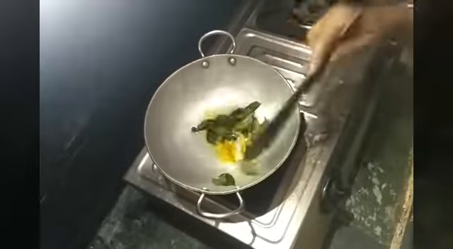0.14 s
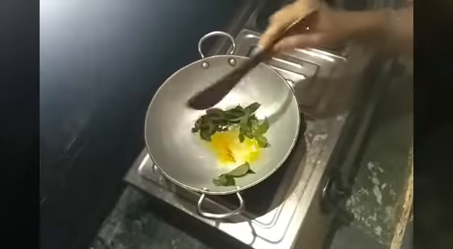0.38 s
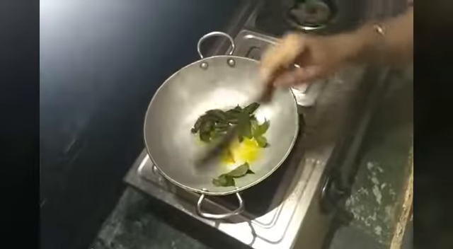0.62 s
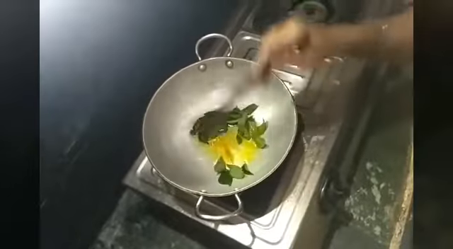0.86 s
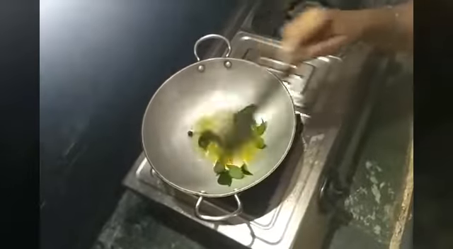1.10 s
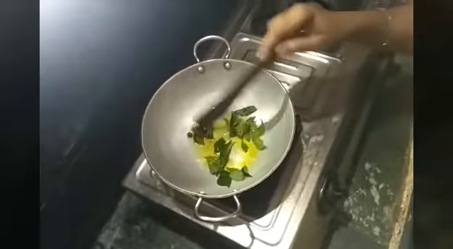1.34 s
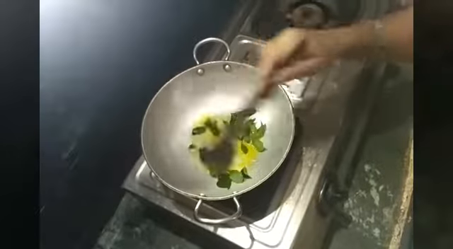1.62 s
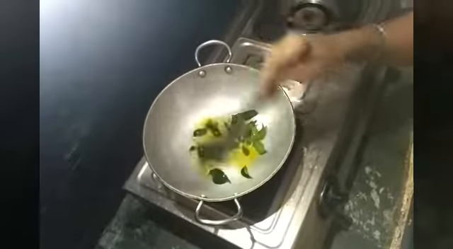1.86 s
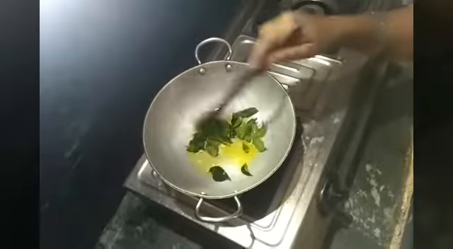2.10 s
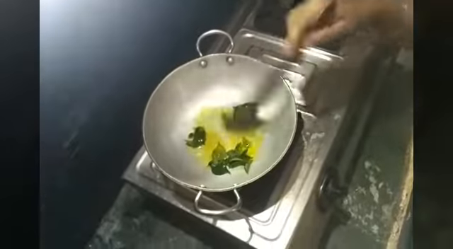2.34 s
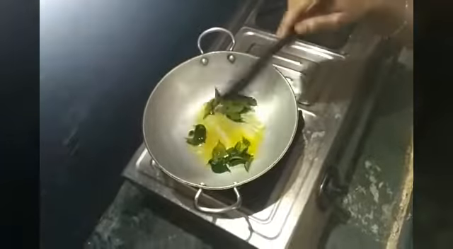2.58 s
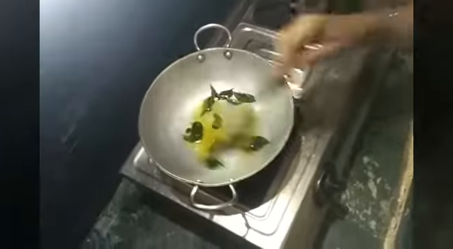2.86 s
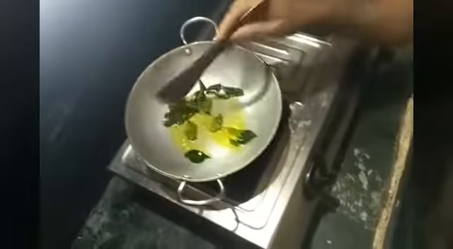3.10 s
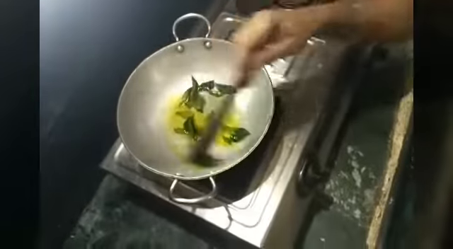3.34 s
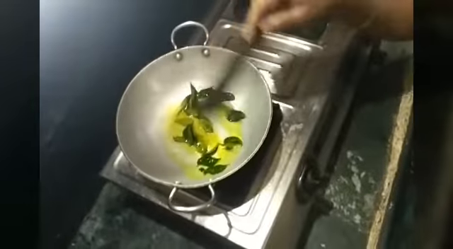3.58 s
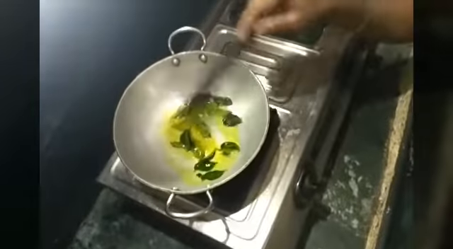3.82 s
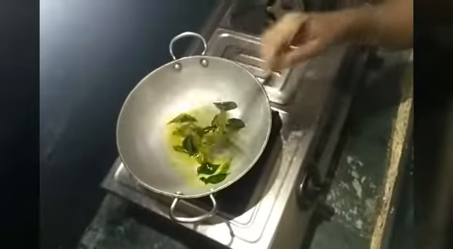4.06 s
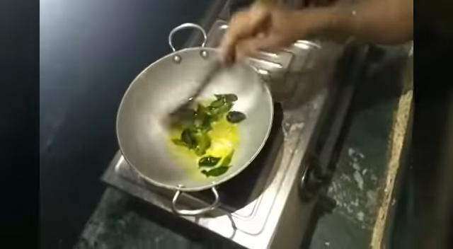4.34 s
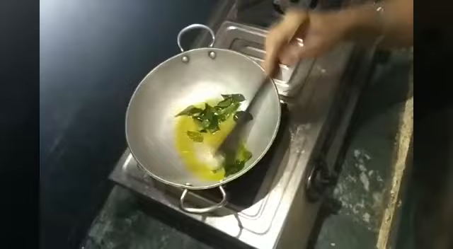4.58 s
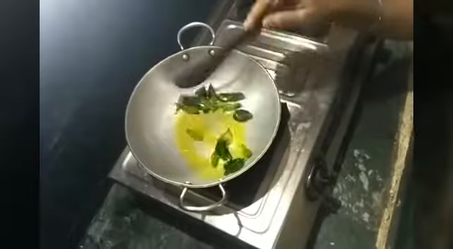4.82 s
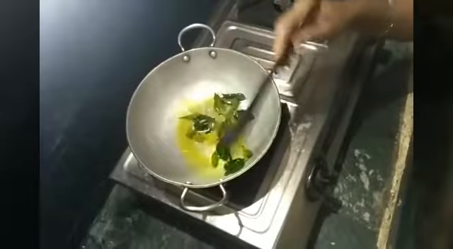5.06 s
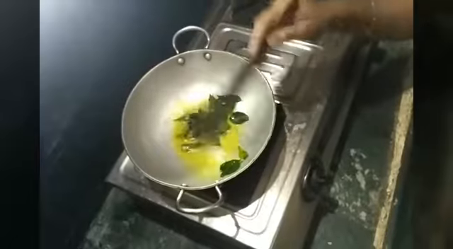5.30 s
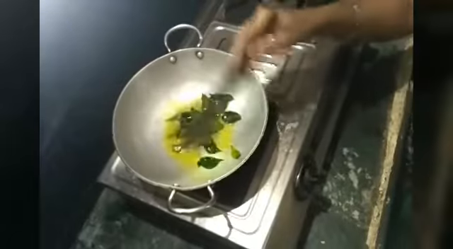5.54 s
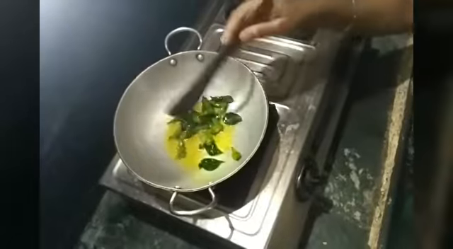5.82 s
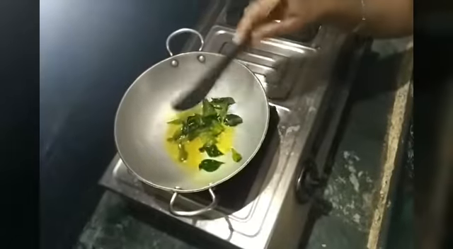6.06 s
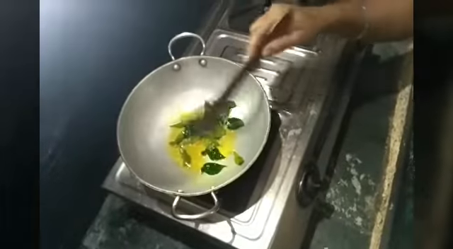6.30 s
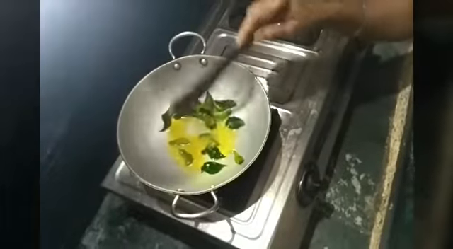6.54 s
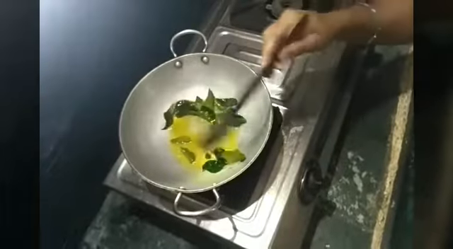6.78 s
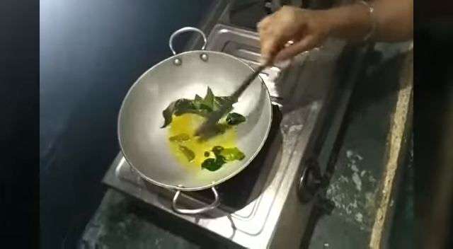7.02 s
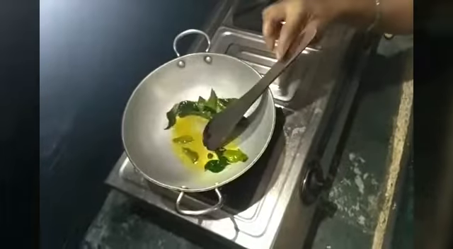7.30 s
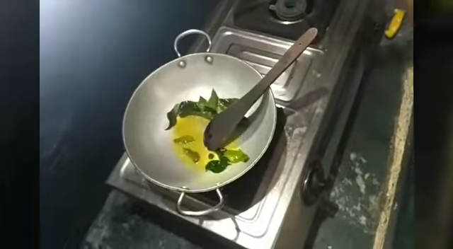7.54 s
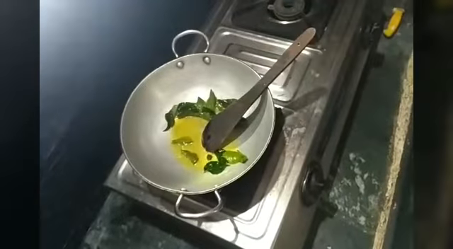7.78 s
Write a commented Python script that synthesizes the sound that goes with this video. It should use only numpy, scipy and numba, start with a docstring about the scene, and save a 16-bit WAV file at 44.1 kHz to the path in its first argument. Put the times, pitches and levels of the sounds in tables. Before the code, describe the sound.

Crisp high frying fizz, crackling steam bursts and dull wooden knocks on a thin steel pan, ending with a loud spatula clack against the rim.

```python
"""From the first moment fresh leaves fry in hot oil in a round steel pan: clumped steam bubbles fizz,
deeper ones gurgle, and a low drone swells and sinks under the hush of a small kitchen.
Soon trapped water spits in sharp pops with dying swarms of crackles, and a wooden spatula knocks
the pan's ringing modes, scrapes in noisy strokes and draws faint notes from the steel.
Near the end the spatula drops on the rim in a clatter; one microphone hears it all."""
import sys
import numpy as np
from scipy import signal
from scipy.fft import rfft, irfft, next_fast_len
from scipy.io import wavfile
from scipy.ndimage import uniform_filter1d
from numba import njit

SR = 44100
rng = np.random.default_rng(int(sys.argv[2]) if len(sys.argv) > 2 else 0)


def volts_from_decibels(level):
    """Turn decibel levels (scalar or array-like) into linear amplitude factors."""
    exponent = np.asarray(level, float) / 20
    return 10 ** exponent


def int16_out(signal):
    """Quantize to a 16-bit WAV file."""
    q = np.round(np.clip(np.atleast_2d(signal).T, -1, 1) * 32767)
    wavfile.write(sys.argv[1], SR, q.astype(np.int16))


N = 348398
TIME = np.arange(N) / SR  # seconds

# Frying bed. Each row: time in seconds, small-bubble level in dB, large-bubble level in dB.
FRYING_LEVELS = [(0.0, -56, -56), (0.33, -49, -54), (0.83, -52, -63.5), (1.12, -45, -55), (1.3, -53.5, -59),
                 (3.1, -47.5, -53.5), (3.32, -52.5, -58.5), (4.29, -50.5, -58.5), (4.75, -50, -57),
                 (4.97, -50.5, -63.5), (7.5, -54, -64.5), (7.9, -53, -76)]
# Tone of the frying bed. Each row: bubble pitch in Hz, relative weight in dB.
BUBBLE_TONE = [(2650, -49), (4500, -37), (6690, -12), (7260, -24), (9070, 11.5), (9690, -1.5), (11100, 9),
               (15200, 0.5), (16100, -23), (16500, -46)]
# Deep bubbles under the leaves. One row: middle pitch in Hz, range in octaves, level in dB,
# depth of clumping in dB.
DEEP_BUBBLES = (2371, 0.67, -67, 2.2)
# Low drone. Each row: time in seconds, level in dB.
DRONE_LEVELS = [(0.0, -50.5), (0.9, -59.5), (1.87, -91), (1.93, -54), (2.02, -84), (2.2, -47.5),
                (2.38, -43), (2.46, -68), (2.53, -54), (2.73, -49), (2.75, -68), (2.84, -44), (2.95, -47.5),
                (3.06, -67), (3.1, -50), (3.39, -52), (3.41, -42.5), (3.67, -35.5), (4.0, -51.5),
                (4.03, -68), (4.16, -42), (4.49, -37.5), (4.84, -72.5), (5.39, -37.5), (5.74, -40),
                (5.79, -49), (6.01, -52.5), (6.09, -34), (6.49, -51), (6.62, -47.5), (6.8, -79), (7.2, -69),
                (7.75, -95), (7.9, -52)]
# Resonances rumbling above the drone. Each row: pitch in Hz, width as a share of the pitch,
# level in dB against the others.
RUMBLE_BANDS = [(99.5, .1, 1.5), (134.3, .12, -0.5), (172.5, 0.12, -5.5), (145, 0.79, -9.5)]
# Tone of the room hush. Each row: frequency in Hz, relative level in dB.
KITCHEN_TONE = [(15, -42), (25, 1), (82, 10), (146, 1), (450, 0.5), (516, -2), (695, -1.5), (1230, -5),
                (1700, -5.5), (2290, -3), (2880, -9), (4770, -13), (6000, -11), (7800, -57), (13200, -120)]
# Hum of the pan's deepest mode. Each row: time in seconds, level in dB.
HUM_LEVELS = [(0.0, -59), (0.33, -85), (0.44, -58), (1.38, -79), (1.43, -61), (1.82, -82), (1.96, -54.5),
              (2.53, -56), (2.84, -98), (3.06, -53), (3.32, -64), (3.41, -54), (4.18, -89), (4.25, -50),
              (4.33, -84), (5.21, -100), (5.3, -51.5), (5.54, -75), (5.65, -40.5), (5.85, -47.5),
              (6.1, -56), (6.49, -73), (7.13, -85), (7.17, -54), (7.26, -75), (7.37, -40), (7.61, -74),
              (7.9, -90)]
# Notes drawn by the rubbing blade. Each row: start in seconds, length in seconds, first pitch in Hz,
# last pitch in Hz, level in dB.
RUBBED_NOTES = [(0.005, 0.52, 530, 528, -60.5), (3.171, 0.063, 450, 490, -49), (3.23, .1, 482, 527, -54),
                (3.305, 0.096, 520, 510, -48), (3.314, 0.089, 420, 427, -53),
                (3.543, 0.19, 546, 540, -65.5), (5.75, 0.078, 504, 476, -53),
                (5.887, 0.054, 291, 315, -53.5), (5.97, .09, 300, 338, -56.5),
                (6.048, 0.12, 530, 555, -64.5), (6.032, 0.11, 620, 700, -67)]
# Dragged blade shaking the pan on its stand. Each row: strongest moment in seconds, rise in seconds,
# fall in seconds, level in dB, centre in Hz.
GROAN_STROKES = [(.6, 0.89, 0.56, -60, 307), (.9, 0.11, 0.083, -60, 415), (1.199, 0.013, 0.076, -49.5, 337),
                 (2.1, 0.19, 0.28, -56.5, 314), (2.55, 0.075, 0.11, -52, 280), (3.08, 0.21, 0.11, -50, 293),
                 (3.5, 0.11, 0.13, -61, 320), (4.23, 0.013, 0.084, -45, 277),
                 (4.85, 0.072, 0.073, -59.5, 280), (5.12, 0.082, 0.12, -57.5, 324),
                 (5.92, 0.37, 0.24, -52, 294), (6.85, 0.026, 0.043, -52, 278)]
# Spits of steam at set times. Each row: start in seconds, pop level in dB before its trim,
# pitch in Hz, tail t60 in seconds before its limits, swarm level in dB.
TIMED_SPITS = [(.094, -33, 10000, .2, -48), (.113, -30, 9560, 0.17, -43.5), (.1344, -19, 9600, 0.27, -36.5),
               (.1525, -12, 10600, .05, -52), (.160, -4.5, 10800, 0.079, -48),
               (.235, -23.5, 8500, 0.093, -54), (.272, -27, 7940, 0.086, -51),
               (.381, -27, 11600, 0.15, -41), (.404, -18, 11500, 0.19, -39),
               (.4582, -15, 11000, 0.074, -47), (.5781, -23.5, 7160, 0.17, -52.5),
               (.622, -24, 11500, .05, -57), (.7205, -35, 8850, 0.059, -52),
               (.7706, -37.5, 13300, 0.1, -48.5), (.9296, -18, 8960, 0.081, -43.5),
               (1.0045, -22, 7600, 0.085, -47.5), (1.016, -33, 9970, 0.041, -41),
               (1.033, -24, 9100, 0.048, -54), (1.038, -11, 8900, 0.059, -50),
               (1.0637, -4.5, 10500, 0.08, -52), (1.1722, -23, 7390, 0.29, -37.5),
               (1.443, -43, 9720, 0.13, -46.5), (1.4676, -31, 9500, 0.2, -37),
               (1.484, -18, 10000, 0.093, -48), (1.497, -12, 10500, 0.047, -50),
               (1.518, -9.5, 11000, 0.18, -38.5), (1.6178, -21.5, 9360, 0.21, -49),
               (1.632, -24.5, 6660, 0.13, -56), (1.685, -36, 5870, 0.077, -50.5),
               (1.712, -42, 7270, 0.24, -43.5), (1.741, -37, 5700, 0.076, -49),
               (1.808, -39, 6740, 0.033, -59), (1.8765, -19, 11000, 0.089, -44.5),
               (2.0685, -53, 10300, 0.12, -46), (2.087, -31, 9500, 0.052, -49),
               (2.102, -10, 9700, 0.1, -44), (2.136, -30, 7450, 0.037, -51), (2.154, -34, 8500, 0.025, -60),
               (2.243, -26, 6530, 0.33, -42), (2.329, -22.5, 6600, 0.093, -61),
               (2.366, -30, 11000, 0.21, -39), (2.376, -14, 11000, .04, -44),
               (2.393, -10.5, 11000, 0.26, -41), (2.401, -12, 11000, .05, -47),
               (2.455, -33, 7060, .04, -57), (2.535, -10.5, 10650, 0.14, -42.5),
               (2.546, -14, 11700, .05, -41), (2.557, -11, 11700, .12, -43), (2.7127, -27, 9300, 0.1, -52),
               (2.8175, -11.5, 9000, 0.12, -36), (2.9898, -11.5, 8500, 0.12, -39),
               (3.132, -20, 8600, 0.075, -47), (3.145, -13.5, 8800, 0.18, -47),
               (3.2085, -25, 10800, 0.32, -46), (3.411, -27, 8150, 0.16, -43.5),
               (3.564, -29, 8100, 0.071, -52.5), (3.601, -36, 9600, 0.049, -52),
               (3.662, -28, 10700, 0.05, -47), (3.732, -24, 10200, 0.071, -52),
               (3.766, -19, 11000, 0.21, -40), (3.937, -33, 9800, 0.12, -53),
               (4.0575, -36, 10000, 0.048, -60), (4.195, -29, 9400, 0.14, -57),
               (4.3, -27, 11000, 0.034, -59), (4.384, -13.5, 7750, .05, -48),
               (4.39, -25, 10100, 0.19, -32.5), (4.5425, -13.5, 10200, 0.39, -42),
               (4.55, -40, 7070, 0.39, -49), (4.5955, -28, 7900, 0.062, -50),
               (4.635, -25, 7400, 0.087, -59), (4.749, -32, 6700, 0.098, -55),
               (4.772, -26, 9800, 0.25, -33.5), (4.775, -21.5, 6960, 0.27, -53.5),
               (4.865, -34, 6900, 0.11, -57), (5.008, -30, 11000, 0.052, -51), (5.17, -46, 6360, 0.17, -56),
               (5.307, -32, 9540, 0.086, -49), (5.395, -22, 8900, .11, -53), (5.426, -12, 13500, 0.07, -54),
               (5.497, -37, 12350, 0.098, -45), (5.53, -49, 7400, 0.23, -47.5),
               (5.697, -18.5, 10000, 0.16, -34.5), (5.7815, -16, 9950, 0.13, -42.5),
               (5.9325, -14, 12100, 0.23, -47), (5.9858, -17.5, 12800, 0.12, -44),
               (6.039, -40, 11000, 0.056, -63), (6.1325, -18, 11000, 0.037, -44.5),
               (6.2468, -19.5, 11000, 0.085, -55), (6.3405, -35, 9000, 0.079, -39),
               (6.344, -25, 7440, .04, -41.5), (6.3525, -6.5, 10350, 0.22, -42.5),
               (6.797, -17.5, 9770, 0.11, -40), (6.8285, -15.5, 10100, 0.28, -52),
               (7.1218, -15.5, 8500, 0.18, -47.5), (7.278, -27, 10600, 0.064, -55),
               (7.326, -21, 7170, 0.2, -32), (7.399, -13, 10900, 0.17, -46),
               (7.789, -21.5, 11000, 0.13, -42)]
# Middle of the faint spits at random times. One row: pop level in dB before its trim, pitch in Hz,
# tail t60 in seconds, swarm level in dB.
FAINT_SPIT = (-47, 10002, 0.2, -57)
# Spatula blows. Each row: start in seconds, level in dB, centre in Hz, rattle in dB before its trim,
# t60 in seconds while the wood rests on the steel, first knock peak in dB.
SPATULA_BLOWS = [(0.379, -27.5, 930, -9.5, 0.25, -29), (0.405, -24, 1110, -12, 0.027, -45),
                 (1.431, -60.5, 430, 0.5, 0.26, -55.5), (1.915, -37.5, 1080, 1.5, 0.2, -31.5),
                 (1.933, -28, 750, -22.5, 0.3, -52), (2.267, -24.5, 1900, -13.5, 0.15, -26.5),
                 (2.27, -29, 720, -10.5, 0.25, -30.5), (2.516, -31.5, 2020, -17, 0.28, -54),
                 (3.019, -39.5, 490, -16, 0.16, -43), (3.294, -45.5, 710, 4.5, 0.14, -39),
                 (3.323, -47, 426, 1, 0.38, -35), (4.211, -40, 853, -1, 0.23, -30.5),
                 (5.273, -37.5, 793, -13.5, 0.35, -29.5), (5.573, -50, 1180, -1, 0.086, -54),
                 (5.587, -33.5, 780, -17, 0.16, -44), (5.616, -35.5, 434, -12.5, 0.4, -34),
                 (6.81, -33.5, 1430, -20, 0.33, -35), (6.929, -51.5, 2580, -1, 0.11, -41),
                 (7.137, -25.5, 1490, -26, 0.22, -26.5), (7.171, -33.5, 2520, -21, 0.087, -35),
                 (7.3, -29, 1970, -10, 0.36, -42), (7.3263, -13, 2130, -10, 0.2, -6.5),
                 (7.336, -16.5, 1950, -22, 0.32, -28), (7.351, -19, 1880, -13.5, 0.27, -23),
                 (7.358, -24.5, 410, -13.5, 0.31, -50), (7.375, -24, 2600, -10, 0.13, -27),
                 (7.399, -33.5, 1740, 1, 0.15, -30), (7.486, -42, 2420, -1, 0.031, -41)]
# Where each blow lands, one entry a blow: 0 bottom, 1 wall, 2 near the centre, 3 rim.
BLOW_PLACES = [0, 0, 1, 1, 1, 1, 1, 1, 0, 0, 1, 0, 0, 0, 1, 1, 2, 0, 2, 2, 3, 3, 3, 3, 1, 3, 3, 3]
# Pitches of the pan's modes in Hz, lowest first.
MODE_HZ = [240, 296, 424, 568, 694, 762, 888, 990, 1045, 1095, 1330, 1378, 1478, 1510, 1550, 1614, 1755,
           1866, 2029, 2090, 2210, 2295, 2350, 2456, 2594, 2755, 3166, 3294, 3548, 4151]
# The same modes. Each row: t60 in seconds before damping is scaled, then the relative level in dB
# when struck at place 0, 1, 2 and 3.
MODE_RING = [(0.19, -7, -29, -15, -5), (1, 2, 8.5, -5, -11), (1, 6.5, 6.5, -11.5, 0),
             (0.6, 2.5, -1, -19, -31), (0.62, -23, -2, -7, -9), (0.48, -16, 12, 2.5, -0.5),
             (0.35, 10.5, 8, -2, -11), (0.44, 0.5, 7, -10, -30), (0.38, -5, -33, -14, -25),
             (1, -22, -3, -15, 3.5), (0.32, -30, 6, -1, -15), (0.15, -47, -46, 1, 3.5),
             (0.43, -43, -24, 3, -19), (0.28, -16, -11, 1, -27), (0.46, -41, -56, 10, -25),
             (0.2, -65, -28, -11, -14), (0.44, -57, -51, -21, 0), (0.58, -29, -27, -29, 2),
             (0.16, -28, -41, -32, 3), (0.12, 9, -18, -33, -14), (0.17, 16, -35, -32, 10),
             (0.14, 13, 2.5, -28, -20), (0.67, -27, 12.5, -6, -21), (0.15, 14, 12, -9, -8),
             (0.043, 5, -37, 4, -21), (0.021, -24, 26.5, -24, -9), (0.15, -5, -4, -15, 2),
             (0.38, -4, 10, -39, -0.5), (0.21, -1, 1, -40, 6.5), (0.18, -10, -33, -40, -3)]
# Wood stroking steel. Each row: strongest moment in seconds, rise in seconds, fall in seconds,
# level in dB, centre in Hz.
SCRAPE_STROKES = [(.47, 0.11, 0.13, -49.5, 2000), (0.54, 0.11, 0.18, -43.5, 1920),
                  (.535, 0.03, 0.19, -46.5, 1330), (1.216, 0.052, 0.038, -44, 2660),
                  (1.756, 0.092, 0.04, -47.5, 2720), (2.65, 0.065, 0.034, -54, 3100),
                  (2.825, 0.033, 0.047, -50.5, 2460), (3.0, 0.11, 0.14, -54, 2500),
                  (3.2, 0.22, 0.11, -56.5, 2520), (3.8, 0.11, 0.11, -55, 3100),
                  (4.31, 0.036, 0.031, -55, 2340), (4.55, 0.051, 0.16, -54.5, 2680),
                  (3.96, 0.055, 0.17, -55.5, 3060), (4.755, 0.035, 0.23, -54, 2720),
                  (5.602, 0.086, 0.055, -51.5, 2720), (6.346, 0.0068, 0.054, -48, 2500),
                  (6.526, .03, 0.14, -53.5, 2470)]


def curve(table):
    """Draw each column after the time column as a sample-rate curve."""
    s, *columns = np.transpose(table)
    return [np.interp(TIME, s, c) for c in columns]


def unit(x):
    """Scale to rms 1."""
    return x / np.sqrt(np.mean(x ** 2))


def shape_db(hz, points):
    """Read a (Hz, dB) spectrum on a log frequency axis."""
    f, db = np.transpose(points)
    return np.interp(np.log(hz + 1), np.log(f), db)


def walk(rate):
    """Random levels held for 1 / rate seconds and slewed twice; rms 1."""
    hold = int(SR / rate)
    steps = np.repeat(rng.standard_normal(N // hold + 1), hold)
    return unit(uniform_filter1d(uniform_filter1d(steps, hold), hold)[:N])


@njit
def svf(x, hz, width):
    """Band-pass whose centre may move every sample; width is a share of the centre."""
    y, b, l = np.empty(len(x)), 0., 0.
    for i in range(len(x)):
        g = np.tan(np.pi * hz[i] / SR)
        v = (b + g * (x[i] - l)) / (1 + g * (g + width))
        b, l, y[i] = 2 * v - b, l + 2 * g * v, width * v
    return y


def band(x, hz, *widths):
    """Pass x through one band-pass per width, all centred on hz."""
    centre = np.zeros(len(x)) + hz
    for width in widths:
        x = svf(x, centre, width)
    return x


@njit
def grains(s, hz, cycles, size):
    """Bursting bubbles: each swells and dies within a few cycles of its own pitch."""
    out = np.zeros(N)
    for k in range(len(s)):
        start, life = int(s[k] * SR), cycles[k] * SR / hz[k]
        for i in range(max(min(int(8 * life), N - start), 0)):
            u = i / life
            out[start + i] += size[k] * np.e * u * np.exp(-u) * np.sin(2 * np.pi * hz[k] * i / SR)
    return out


def steady(hz, width, floor=0.028):
    """A noise-driven resonance that wavers in pitch more than in size."""
    tone = band(rng.standard_normal(N), hz, width, 3 * width)
    envelope = np.abs(signal.hilbert(tone, next_fast_len(N))[:N])
    swing = uniform_filter1d(envelope, size=2000)
    return unit(tone / (swing + floor * swing.mean()))


def swell(peak_s, rise_s, fall_s, edge_db=-23.0, hold=1.):
    """Gain that climbs to 1 and falls again, edge_db down one rise before and one fall after the peak."""
    late = TIME - peak_s
    distance = np.where(late < 0, -late / max(rise_s, .005), late / max(fall_s, .005))
    return volts_from_decibels(edge_db * distance ** hold)


def fizz(count=30000, clump_db=2.5, scatter_db=2.5, cycles=0.72, patchy_db=2.0, large_hz=8070.0):
    """Thousands of tiny bubbles a second crowd in clumps; large and small ones come and go apart."""
    small_db, large_db = curve(FRYING_LEVELS)
    when, pitch, luck, long = rng.random((count, 4)).T
    crowd = np.cumsum(volts_from_decibels(clump_db * walk(25)))
    at = np.interp(when, crowd / crowd[-1], TIME)
    hz = 4500 * 3.6 ** pitch
    size = np.sqrt(hz) * volts_from_decibels(shape_db(hz, BUBBLE_TONE) - scatter_db * np.log(1 - .998 * luck))
    ring_cycles = cycles * (1 + 2 * long)
    small, large = (unit(grains(at[k], hz[k], ring_cycles[k], size[k]))
                    for k in (hz >= large_hz, hz < large_hz))
    small_gain = volts_from_decibels(small_db + patchy_db * walk(38))
    large_gain = volts_from_decibels(large_db + patchy_db * walk(8.4))
    return (small + droplets()) * small_gain + large * large_gain


def droplets(count=500, level_db=-12.0, cycles=.7, scatter_db=5.0):
    """Lone droplets crack dry and broad over the bed, each ringing less than a few cycles."""
    when, pitch, luck = rng.random((count, 3)).T
    size = volts_from_decibels(-scatter_db * np.log(1 - .97 * luck))
    ticks = grains(when * N / SR, 8000 * 1.5 ** pitch, np.full(count, cycles), size)
    return volts_from_decibels(level_db) * unit(ticks)


def gurgle(count=20000, cycles=5.8, scatter_db=6.0):
    """Bigger bubbles ring longer and lower, coming and going in patches."""
    centre_hz, octaves, db, clump_db = DEEP_BUBBLES
    when, pitch, luck = rng.random((count, 3)).T
    pitch = .5 + np.log((pitch + .01) / (1.01 - pitch)) / 5  # most near one size, a few far off
    hz = centre_hz * 2 ** (octaves * (pitch - .5))
    size = volts_from_decibels(-scatter_db * np.log(1 - .9 * luck))
    bubbles = grains(when * N / SR, hz, np.full(count, cycles), size)
    return unit(bubbles) * volts_from_decibels(db + clump_db * walk(20))


def drone(pitch_hz=71.66, width=.035, waver_db=-1.0):
    """A low air resonance shaken by noise, with a rumble above it."""
    gain = volts_from_decibels(curve(DRONE_LEVELS)[0])
    return gain * volts_from_decibels(waver_db * walk(12)) * steady(np.full(N, pitch_hz), width) + rumble(gain)


def rumble(drone_gain, level_db=-9, smooth_s=0.48):
    """Weaker noise-driven resonances that follow only the drone's slow swells."""
    tones = sum(volts_from_decibels(db) * unit(band(rng.standard_normal(N), hz, width, 2 * width))
                for hz, width, db in RUMBLE_BANDS)
    slow = uniform_filter1d(drone_gain, size=int(smooth_s * SR))
    return slow * volts_from_decibels(level_db) * unit(volts_from_decibels(2.9 * walk(9)) * tones)


def kitchen(level_db=-61.5):
    """Gently wavering hush of the room and the burner, as shaped noise."""
    tone = volts_from_decibels(shape_db(np.fft.rfftfreq(N, 1 / SR), KITCHEN_TONE))
    hush = irfft(rfft(rng.standard_normal(N)) * tone, N)
    return unit(hush) * volts_from_decibels(level_db + 1.6 * walk(8.1))


def pan_hum():
    """Blows and stirring keep the pan's deepest mode humming, its pitch wavering a little."""
    hz = MODE_HZ[0] * (1 + .012 * walk(12))
    return volts_from_decibels(curve(HUM_LEVELS)[0]) * steady(hz, 0.022)


def rubbed_notes():
    """Now and then the rubbing blade draws a faint gliding note."""
    out = np.zeros(N)
    for s, long_s, from_hz, to_hz, db in RUBBED_NOTES:
        held = uniform_filter1d(1. * ((TIME > s) & (TIME < s + long_s)), size=1500)
        glide = np.interp(TIME, [s, s + long_s], [from_hz, to_hz])
        out += held * volts_from_decibels(db) * steady(glide, .06, .6)
    return out


def slips(rough_db=3.0):
    """Dense slips of wood on steel, as noise uneven in strength."""
    return rng.standard_normal(N) * volts_from_decibels(rough_db * walk(120))


def groan(slip, width=0.41):
    """The dragged blade shakes the pan on its stand: slips heard through low, swelling bands."""
    out = np.zeros(N)
    for s, rise_s, fall_s, db, hz in GROAN_STROKES:
        out += swell(s, rise_s, fall_s) * volts_from_decibels(db) * unit(band(slip, hz, width, width, 2 * width))
    return out


def spits(count=400, faint_count=70, sputter_count=12, sputter_db=9.5, scatter_db=3.0,
          swell_s=0.0013, hold=1.474, pop_db=-5.0, pop_cycles=2.4, swarm_cycles=2.5):
    """Water trapped in a leaf bursts: one pop, then a dying swarm of crackles around its pitch."""
    luck = rng.random((faint_count, 5))
    spread = (luck[:, 1:] - .5) * (10.0, 4000.0, .08, 9.0)
    faint = np.c_[luck[:, 0] * N / SR, FAINT_SPIT + spread]
    rows = np.r_[TIMED_SPITS, faint]
    chance = rng.random((len(rows), count, 4))
    s, db, centre_hz, t60, tail_db = (c[:, None] for c in rows.T)
    t60 = np.clip(t60, .03, .8)
    late = chance[..., 0] * t60 * .7
    scatter = -scatter_db * (np.log(1 - .97 * chance[..., 1]) + 1)
    size = volts_from_decibels(tail_db - 60 * (late / t60) ** hold + scatter)
    size = size * np.minimum(late / swell_s + .4, 1)
    # range of crackle pitches in octaves
    octaves = 0.54 + 0.69 * np.abs(np.log2(centre_hz / 11000))
    hz = np.clip(centre_hz * 2 ** (octaves * (chance[..., 3] - .5)), 3000, 16000)
    # a few crackles sputter above the swarm
    size = size * volts_from_decibels(sputter_db * (np.arange(count) < sputter_count))
    # they come in flurries
    size = size * volts_from_decibels(2.3 * walk(160)[np.minimum((s + late) * SR, N - 1).astype(int)])
    cycles = swarm_cycles * (1 + chance[..., 2])
    swarm = grains((s + late).ravel(), hz.ravel(), cycles.ravel(), size.ravel())
    pop = grains(s[:, 0] + 0.0016, centre_hz[:, 0], np.full(len(rows), pop_cycles),
                 volts_from_decibels(db[:, 0] + pop_db))
    return swarm + pop


def mode_ring(t, centre_hz, held_s, place, flutter_db=7.0, press=1.65, damp=0.86):
    """Ring the modes that move where the blow lands; wood resting on the steel chokes them."""
    hz = np.c_[MODE_HZ]
    t60, *place_db = (c[:, None] for c in np.transpose(MODE_RING))
    # a soft, long push cannot reach the high modes
    gain = volts_from_decibels(place_db[place]) / (1 + (hz / (2.4 * centre_hz)) ** 4)
    # the resting wood chokes more as it settles, and makes each ring flutter
    steps = np.repeat(rng.standard_normal((len(hz), 64)), 250, axis=1)
    flutter = uniform_filter1d(steps, size=250)
    fade = volts_from_decibels(flutter_db * flutter - 60 * (damp * t / t60 + (t / held_s) ** press))
    ring = gain * fade * np.sin(2 * np.pi * (hz * t + rng.random((len(hz), 1))))
    return ring.sum(axis=0) / np.sqrt(np.sum(gain ** 2)) / 2


def stand_rattle(t, centre_hz, rattle_db, held_s, minor, body_db=2.0, width=0.81,
                 jingle_db=-20.5, jingle_hz=8500.0, settle=1.14):
    """The pan rattles on its loose stand as fading noise; brighter blows jingle more in the treble."""
    noise = rng.standard_normal(len(t))
    body = band(irfft(rfft(noise) * minor), centre_hz, width, width)
    rattle = volts_from_decibels(rattle_db + body_db) * unit(body)
    jingle = volts_from_decibels(jingle_db) * (centre_hz / 1000) ** 2 * band(noise, jingle_hz, 0.87, 1.0)
    return (rattle + jingle) * volts_from_decibels(-60 * (t / held_s) ** settle)


def spatula(knock_cycles=1.6, minor_db=5.5):
    """Each blow knocks, rings the pan's modes and leaves it rattling on its stand."""
    out, t = np.zeros(N + SR), TIME[:16000]
    # uneven spectrum of the pan's countless small resonances, the same for every blow
    minor = volts_from_decibels(minor_db * unit(uniform_filter1d(rng.standard_normal(len(t) // 2 + 1), size=14)))
    for (s, db, centre_hz, rattle_db, held_s, _), place in zip(SPATULA_BLOWS, BLOW_PLACES):
        held_s = max(held_s, .03)
        blow = mode_ring(t, centre_hz, held_s, place)
        blow = blow + stand_rattle(t, centre_hz, rattle_db, held_s, minor)
        start = int(s * SR)
        out[start:start + len(t)] += volts_from_decibels(db) * blow * np.minimum(t / .0035, 1)
    s, _, centre_hz, _, _, knock_db = np.transpose(SPATULA_BLOWS)
    knocks = grains(s + 0.000986, centre_hz, np.full(len(s), knock_cycles), volts_from_decibels(knock_db))
    return out[:N] + knocks


def scrape(slip, width=0.52, rustle_db=-13.0, rustle_hz=4930.0):
    """Every stroke of wood over steel swells and fades, and pushed leaves rustle above."""
    out = np.zeros(N)
    rustle = volts_from_decibels(rustle_db) * unit(band(slip, rustle_hz, 0.27, 0.27, 0.54))
    for s, rise_s, fall_s, db, hz in SCRAPE_STROKES:
        stroke = unit(band(slip, hz, width, width, 2 * width)) + rustle
        out += swell(s, rise_s, fall_s, hold=1.19) * volts_from_decibels(db) * stroke
    return out


def tiled_walls(sent, t60=0.069):
    """Short tail of tiled walls: decaying noise, silent for its first 2 ms."""
    t = TIME[:SR // 2]
    walls = rng.standard_normal(len(t)) * volts_from_decibels(-60 * t / t60) * (t > .002)
    return signal.fftconvolve(sent, walls / np.sqrt(np.sum(walls ** 2)))[:N]


def scene(oil_room_db=-6.5, pan_room_db=-10.0):
    """Mix oil and pan with their wall tail, which takes more of the oil, over drone and hush."""
    high_pass = signal.butter(3, 4600.0, "high", fs=SR, output="sos")
    oil = signal.sosfilt(high_pass, fizz() + spits())
    slip = slips()  # the same slips drive both groan and scrape
    pan = gurgle() + pan_hum() + rubbed_notes() + groan(slip) + spatula() + scrape(slip)
    tail = tiled_walls(volts_from_decibels(oil_room_db) * oil + volts_from_decibels(pan_room_db) * pan)
    return np.tile(oil + pan + tail + drone() + kitchen(), (2, 1))


def band_limit(x):
    """A steep low-pass at the top of the band."""
    return signal.sosfilt(signal.butter(12, 16660, fs=SR, output="sos"), x)


def record(dry):
    """One microphone on both channels, its top cut off steeply."""
    top = signal.ellip(8, .2, 60, 15550, fs=SR, output="sos")
    mix = signal.sosfilt(top, dry)
    return band_limit(mix)


dry = scene()
out = record(dry)
int16_out(out)
```